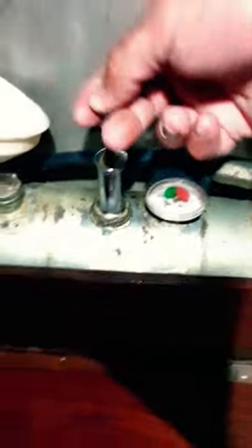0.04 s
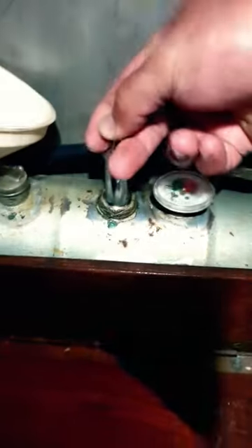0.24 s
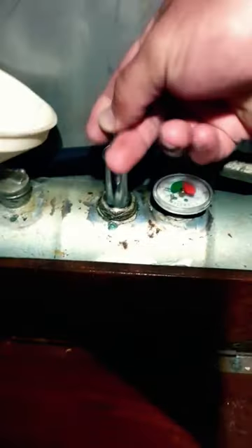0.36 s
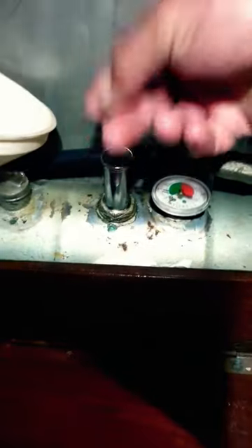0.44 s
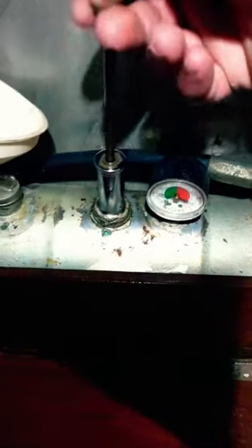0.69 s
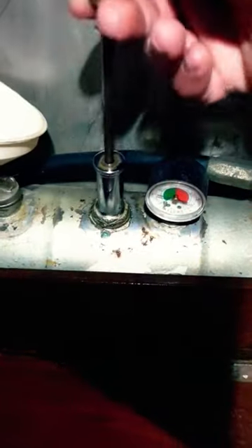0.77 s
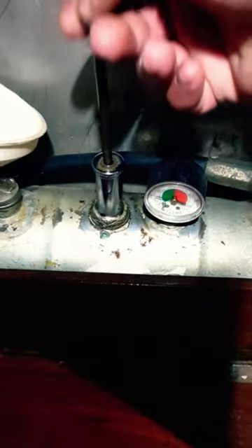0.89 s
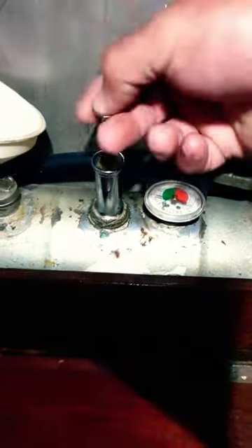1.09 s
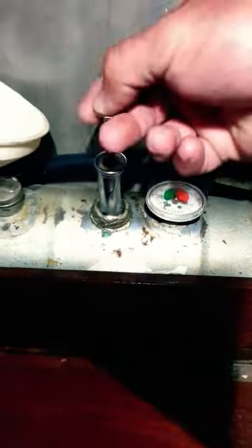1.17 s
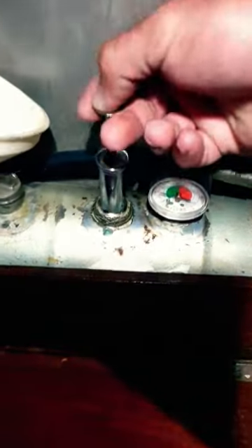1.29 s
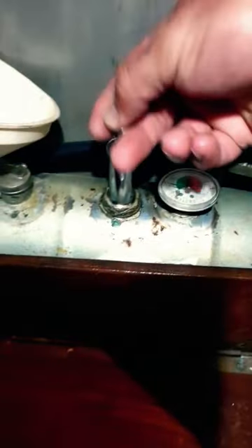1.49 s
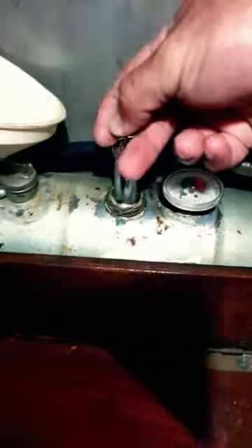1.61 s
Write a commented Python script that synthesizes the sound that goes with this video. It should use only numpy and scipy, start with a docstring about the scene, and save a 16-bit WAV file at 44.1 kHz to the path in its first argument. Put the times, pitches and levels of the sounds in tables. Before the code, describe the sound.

Close by in a quiet cabin, a tank's hand pump gives a short hissing chirp and a metallic clank. Faint scraping, ticks and hand rustle follow as the rod rises, then sharp clicks before it starts down again.

```python
"""A hand works the small air pump on a stove's fuel tank in a quiet cabin, over a faint steady hum.
First the down stroke forces air through the valve with a falling chirp and a hiss.
At 0.3 seconds the plunger strikes home and the tank rings. Then the rod is drawn up, scraping and
ticking in its guide, and clicks at the top near 1.2 seconds. Last, it starts down again,
and the valve just opens as the sound ends."""
import sys
import numpy as np
from scipy import signal
from scipy.fft import rfft, irfft
from scipy.io import wavfile
from scipy.ndimage import uniform_filter1d

SR = 44100
rng = np.random.default_rng(int(sys.argv[2]) if len(sys.argv) > 2 else 0)


def waveform_to_disk(signal):
    """Save audio, clipped to [-1, 1], as 16-bit WAV at the path in sys.argv[1]."""
    frames = np.transpose(np.atleast_2d(signal))
    scaled = np.clip(frames, -1, 1) * 32767
    samples = np.round(scaled).astype(np.int16)
    wavfile.write(sys.argv[1], SR, samples)


N = 72765
TIME = np.arange(N) / SR
FREQS = np.fft.rfftfreq(N, 1 / SR)

# The valve's chirp. Each row: time in seconds, pitch in Hz, level in dB.
VALVE_CHIRP = [(.239, 718, -53.5), (0.244, 717, -21), (0.253, 663, -10), (.257, 643, -18), (0.26, 596, -21),
               (.27, 602, -14), (0.277, 558.5, -22.5), (0.289, 523, -22), (.303, 481, -31)]
# Air rushing through the valve. Each row: time in seconds, level in dB.
HISS_LEVELS = [(.19, -56), (.205, -47), (.238, -47), (.243, -30), (.262, -29), (.272, -24.5), (.286, -26.5),
               (.3, -34), (.34, -71.5)]
# The tone colour of that hiss. Each row: frequency in Hz, relative level in dB.
HISS_SPECTRUM = [(40, -6), (150, -15.5), (270, 1), (420, 1.5), (1000, -7), (2300, 2.5), (3300, -2.5),
                 (5000, -2.5), (7300, -8), (8600, -22), (10500, -8.5), (14200, -9.5), (16000, -21)]
# Knocks of the plunger and rod. Each row: start in seconds, then levels in dB for
# the thud, clack, click, tick, tank ring, rod ring and barrel ring.
CONTACTS = [(.041, -74, -59, -54, -63, -50.5, -61, -110), (.117, -60, -49, -85, -62, -55.5, -89, -79),
            (.3008, -25.5, -20, -22.5, -25.5, -10, -54, -37), (.501, -57, -41, -66, -65, -64, -64, -66),
            (.513, -50.5, -47, -73, -61, -61, -59, -49.5), (.552, -60, -49, -62, -70, -56, -68, -50.5),
            (.574, -57, -48, -61, -80, -50, -62, -57), (.584, -59.5, -49.5, -54.5, -63, -52, -51, -42),
            (.644, -49.5, -62, -64.5, -67, -58, -62, -59.5), (.706, -54, -70, -68, -82, -66.5, -76, -68),
            (.917, -62.5, -70, -84, -92, -83, -81, -70), (1.136, -45.5, -44.5, -59, -76, -46.5, -55.5, -63),
            (1.1753, -37, -29, -30, -43, -52, -28, -44.5),
            (1.2695, -42.5, -42, -40.5, -48.5, -46, -43, -36.5),
            (1.392, -93, -60.5, -58, -82, -81, -76, -77), (1.42, -59, -62, -77, -88, -63, -86, -78)]
# The noise of a knock: thud, clack, click and tick. Each row: low edge in Hz, high edge in Hz,
# rise time in seconds, fade time in seconds. A fade time (t60) is how long a drop of 60 dB takes.
CLATTER_BANDS = [(404.2, 832, .003, .13), (1800, 2970, .001, 0.15), (3672, 6930, 0.00047, 0.11),
                 (9600, 11000, 0.00028, 0.09)]
# The first snap of metal on metal. Each row: frequency in Hz, relative level in dB.
SNAP_SPECTRUM = [(1000, -28.5), (3500, -7), (5700, 3), (7500, -3), (9000, -8.5), (10200, 0), (11600, -7),
                 (13700, 3), (16000, -5.5)]
# The ringing notes of the tank, the rod and the pump barrel.
# Each row: pitch in Hz, relative level in dB, fade time in seconds.
TANK_MODES = [(613, -8.5, .115), (844, -19, 0.13), (1432, -33, .29), (1952, -4, 0.13), (2055.5, -2.5, .19),
              (2400, -11, 0.17), (2420, 0, 0.16), (2481, 5.5, .125), (2650, -11.5, 0.17), (2915, -7, 0.09),
              (3516, -16.5, .085), (4290, -19, 0.14), (4692, -8.5, .1), (4840, -10.5, 0.096)]
ROD_MODES = [(515.5, -7, .13), (788.5, -10, 0.17), (1770, -4.5, 0.16), (2023, -1, .1), (2505, -7.5, 0.17),
             (3040, -3.5, 0.18), (4760, -6.5, 0.091), (4860, -2, 0.13), (5220, 3, 0.093),
             (5460, -1.5, 0.12), (6524, -10, 0.21), (9850, -7.5, 0.0813), (10200, -9, 0.098),
             (12800, -23, 0.0512)]
BARREL_MODES = [(490, -7.5, 0.13), (600, -5.5, .13), (854, -9.5, .12), (1114, -6.5, 0.098),
                (1964, -5, 0.24), (2057, -0.5, 0.2), (2490, -13.5, .13), (3248, -8, .11),
                (3332, -4.5, 0.26), (5020, -16, .13), (5800, -7, .09), (6940, -10.5, 0.06),
                (7300, -12, .09)]
# Soft bumps on the tank. Each row: start in seconds, pitch in Hz, level in dB, fade time in seconds.
TANK_BUMPS = [(0.113, 102.3, -41, 0.13), (.113, 791, -44, 0.061), (0.236, 274, -29.5, .09),
              (0.267, 147.6, -35.5, .07), (.298, 76, -40, .16), (0.383, 90.6, -33, .11),
              (.572, 236.6, -49, 0.18), (.639, 818, -44.5, 0.11), (.913, 508, -53.5, 0.14),
              (1.083, 543, -57.5, .18), (1.132, 774, -48.5, 0.097), (1.174, 252.7, -42, 0.048),
              (1.269, 74.5, -62, .2), (1.415, 480, -59, 0.18), (1.640, 261, -33.5, .09)]
# The sliding rod and the rustling hand. Each row: time in seconds, level in dB.
SLIDE_LEVELS = [(0, -63.5), (.06, -58), (.19, -53.5), (.36, -66.5), (.46, -57), (.6, -55), (.68, -58),
                (.78, -71.5), (1.05, -81), (1.14, -59), (1.38, -76), (1.46, -63.5), (1.54, -59),
                (1.65, -52.5)]
HAND_LEVELS = [(0, -56), (.13, -49.5), (.225, -44.5), (.36, -45), (.47, -57.5), (.59, -53), (.68, -56.5),
               (.78, -77), (1.06, -78.5), (1.2, -55.5), (1.32, -61), (1.39, -69), (1.52, -62.5),
               (1.65, -67.5)]
# The tone colours of rod, hand and cabin air. Each row: frequency in Hz, relative level in dB.
SLIDE_SPECTRUM = [(300, -16.5), (1100, -2.5), (1500, -7.5), (2300, 4.5), (3600, -8), (5600, -5), (7200, -7),
                  (8700, -13.5), (10500, -8), (14500, -9)]
HAND_SPECTRUM = [(20, -22.5), (55, 0.5), (110, 0.5), (200, -3), (400, -6.5), (650, -10), (810, -9.5),
                 (960, -26.5), (2000, -41.5), (8000, -63)]
AIR_SPECTRUM = [(20, -20.5), (75, 0.5), (130, -7.5), (220, -10.5), (330, -3), (520, -4.5), (800, -7),
                (1200, -22), (2300, -9), (3300, -13.5), (4500, -11.5), (7000, -13), (8700, -24),
                (10500, -17), (15000, -20)]
# The steady hum. Each row: pitch in Hz, level in dB.
HUM_TONES = [(75.4, -78), (322, -74), (402.6, -64.5), (517, -75), (3930, -79), (4635, -78.5)]
# The left microphone against the right. Each row: frequency in Hz, gain in dB.
LEFT_BALANCE = [(60, -5.5), (200, -4), (400, -1), (650, 0.5), (1200, -2), (1800, -8), (2350, -15),
                (4500, -12), (8000, -6), (11000, -2), (15000, 0.06)]
# How alike noise is on both sides. Each row: frequency in Hz, likeness from 0 to 1.
STEREO_LIKENESS = [(60, 0.75), (600, .92), (1400, 1), (3000, 0.34), (12000, 0.1)]


def valve(metal, overtone_db=-31, ring_db=-8, room_db=-14.5):
    """Air forced through the valve hisses, and its falling chirp rings the tank's lowest note."""
    times, hz, db = np.transpose(VALVE_CHIRP)
    phase = 2 * np.pi * np.cumsum(np.interp(TIME, times, hz) * (TIME > times[0])) / SR
    opening = np.clip((TIME - times[0]) / 0.00067, 0, 1)
    closing = np.exp(-np.maximum(TIME - times[-1], 0) / 0.0075)
    wave = np.sin(phase) + amp(overtone_db) * np.sin(2 * phase)
    tone = np.sqrt(2) * opening * closing * amp(np.interp(TIME, times, db)) * wave
    tank_hz, _, t60 = TANK_MODES[0]
    tank_ring = signal.lfilter(*signal.iirpeak(tank_hz, tank_hz * t60 / 1.7, SR), tone)
    chirp = tone + amp(ring_db) * tank_ring + amp(room_db) * cabin_echo(tone)
    chirp *= amp([[0.25], [-0.25]])  # a touch to the left
    flowing = (TIME > HISS_LEVELS[0][0]) & (TIME < HISS_LEVELS[-1][0])
    hiss = envelope(HISS_LEVELS) * flowing * noise(metal * amp(curve(HISS_SPECTRUM)))
    return chirp + hiss


def knocks(metal, snap_db=5.5, snap_t60=0.028, bounce_s=0.0038, bounce_db=-7.5, spill_db=-22.5):
    """Each contact snaps, clatters and bounces once, and sets the tank, rod and barrel ringing."""
    out, t = np.zeros((2, N)), TIME[:SR // 2]
    bounce = amp(bounce_db) * (t > bounce_s) * np.exp(-abs(t - bounce_s) / 0.0021)
    snap_colour = metal * amp(curve(SNAP_SPECTRUM))
    for start, *band_levels, tank_db, rod_db, barrel_db in CONTACTS:
        sound = amp(tank_db) * ring(TANK_MODES) + amp(rod_db) * ring(ROD_MODES)
        sound += amp(barrel_db) * ring(BARREL_MODES)
        tick_db = band_levels[-1]
        sound += amp(tick_db + snap_db - 60 * t / snap_t60) * noise(snap_colour)[:, :len(t)]
        for db, (low, high, rise, t60) in zip(band_levels, CLATTER_BANDS):
            band = 1 / np.sqrt(1 + (low / (FREQS + 1)) ** 16 + (FREQS / high) ** 16)
            spill = amp(spill_db) / (1 + (FREQS / high) ** 6)  # weak noise outside the band
            fade = (1 - np.exp(-t / rise)) * amp(-60 * t / t60) + bounce
            sound += amp(db) * fade * noise(metal * (band + spill))[:, :len(t)]
        add(out, start, sound)
    return out


def ring(modes, scatter_cycles=0.22):
    """Struck metal rings with fading notes that reach each microphone slightly out of step."""
    t = TIME[:SR // 2]
    hz, db, t60 = np.transpose(modes)[:, :, None]
    offset = scatter_cycles * rng.standard_normal((2, len(modes), 1))
    offset[1] *= 0.5
    notes = amp(db - 60 * t / t60) * np.sin(2 * np.pi * (hz * t + offset))
    return notes.sum(1) * (1 - np.exp(-t / 0.00073))


def metal_colour(depth_db=3.5, width_hz=51):
    """Many weak metal resonances put fine peaks and dips into the treble."""
    ripple = smooth_random(len(FREQS), width_hz * N / SR)
    return amp(depth_db * ripple * np.clip(FREQS / 4500, 0, 1) ** 2)


def bumps(rise_s=0.014):
    """The hand and rod bump the tank, which swings softly at one pitch each time."""
    out = np.zeros((2, N))
    swell = np.minimum(TIME / rise_s, 1)
    for start, hz, db, t60 in TANK_BUMPS:
        fade = amp(db - 60 * np.maximum(TIME - rise_s, 0) / t60)
        add(out, start, fade * swell * np.sin(2 * np.pi * hz * TIME))
    return out


def rubbing(metal, grain_db=0.13):
    """The rod scrapes in its guide with a fine uneven grain while the hand rustles and rumbles."""
    grain = amp(grain_db * waver(0.0057))
    slide = envelope(SLIDE_LEVELS) * grain * noise(metal * amp(curve(SLIDE_SPECTRUM)))
    hand = envelope(HAND_LEVELS) * noise(amp(curve(HAND_SPECTRUM)))
    return slide + hand


def cabin_echo(sound, t60=0.2):
    """The wooden cabin throws back short, dense reflections."""
    tail = noise(1) * amp(-60 * TIME / t60) * np.minimum(TIME / 0.008, 1)
    tail = tail[:, :SR // 3]
    return signal.fftconvolve(sound[None], tail / np.linalg.norm(tail[0]), axes=1)[:, :N]


def background(air_db=-68, wobble=0.12):
    """Quiet cabin air and a hum that wavers slightly in level and pitch."""
    hum = np.zeros(N)
    for hz, db in HUM_TONES:
        gain = amp(db) * np.sqrt(2) * (1 + wobble * waver(0.08))
        phase = 2 * np.pi * (hz * TIME + rng.random()) + wobble * waver(0.078)
        hum += gain * np.sin(phase)
    return hum + amp(air_db) * noise(amp(curve(AIR_SPECTRUM)))


def noise(colour):
    """Stereo noise of strength 1 in the given tone colour, partly alike on both sides."""
    shared, separate = rfft(rng.standard_normal((2, N)))
    likeness = np.clip(curve(STEREO_LIKENESS), 0, 1)
    left = likeness * shared + np.sqrt(1 - likeness ** 2) * separate
    return unit_rms(irfft(np.array([left, shared]) * colour, N))


def waver(seconds):
    """A random drift that changes over about this many seconds."""
    return smooth_random(N, seconds * SR)


def smooth_random(count, width):
    """Random values of strength 1, smoothed twice over `width` neighbours."""
    size = max(round(width), 1)
    return unit_rms(uniform_filter1d(uniform_filter1d(rng.standard_normal(count), size), size))


def amp(db):
    """Turns decibels into a gain to multiply by."""
    return 10 ** (np.asarray(db) / 20)


def unit_rms(x):
    """Scales a signal so its average strength (rms) is 1."""
    return x / np.sqrt(np.mean(x ** 2) + 1e-20)


def curve(points):
    """Joins a table's points into a curve over frequency, on a log scale."""
    hz, value = np.transpose(points)
    return np.interp(np.log(FREQS + 1), np.log(hz), value)


def envelope(points):
    """Joins levels in dB into a gain that changes over time."""
    return amp(np.interp(TIME, *np.transpose(points)))


def add(mix, start, sound):
    """Mixes a sound in at a start time in seconds."""
    part = mix[..., max(round(start * SR), 0):]
    n = min(part.shape[-1], sound.shape[-1])
    part[..., :n] += sound[..., :n]


def scene(echo_db=-12.5, next_delay_s=1.4015, next_db=-11):
    """One stroke of the pump in the cabin; the valve just opens for the next."""
    metal = metal_colour()
    hits = knocks(metal)
    out = valve(metal) + hits + amp(echo_db) * cabin_echo(hits[1], t60=0.071)
    out += bumps() + rubbing(metal) + background()
    next_stroke = valve(metal) * (TIME > VALVE_CHIRP[0][0])
    add(out, next_delay_s, amp(next_db) * next_stroke)
    return out


def record(dry, left_lead_s=0.00016, notch_hz=8650, notch_q=6, top_hz=15800):
    """The left microphone is shaded and a little early; both have a treble dip and lose the very top."""
    left = irfft(rfft(dry[0]) * amp(curve(LEFT_BALANCE)), N)
    left = np.interp(TIME + round(left_lead_s * SR) / SR, TIME, left, right=0)
    pair = signal.lfilter(*signal.iirnotch(notch_hz, notch_q, SR), np.array([left, dry[1]]))
    pair = pair / (1 + pair ** 6) ** (1 / 6)  # gently rounds off loud peaks
    lowpass = signal.firwin(255, top_hz, window=("kaiser", 9), fs=SR)
    return signal.oaconvolve(pair, lowpass[None], "same")


dry = scene()
out = record(dry)
waveform_to_disk(out)
```